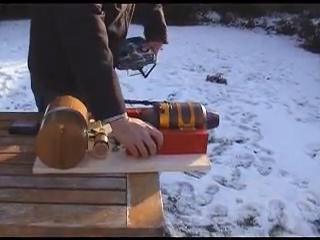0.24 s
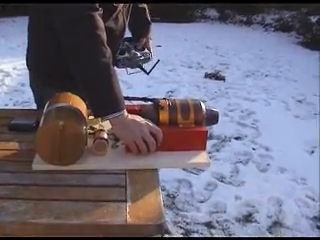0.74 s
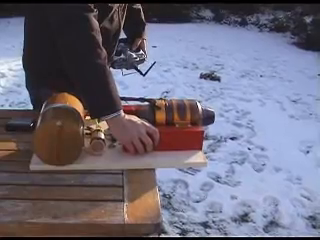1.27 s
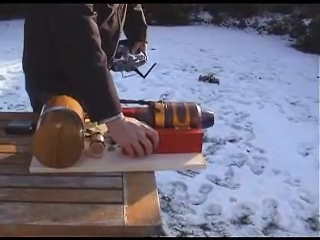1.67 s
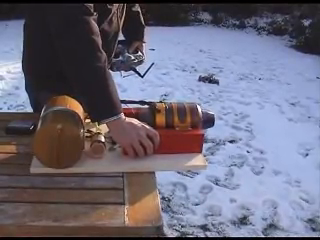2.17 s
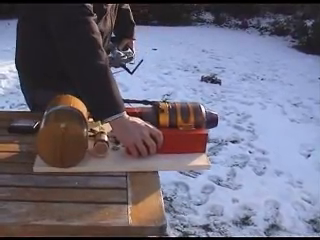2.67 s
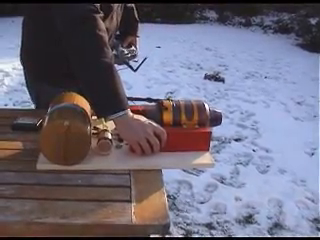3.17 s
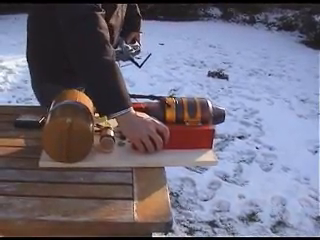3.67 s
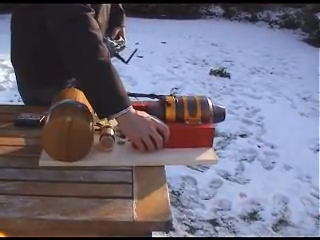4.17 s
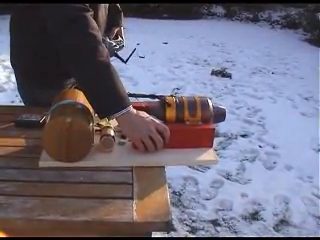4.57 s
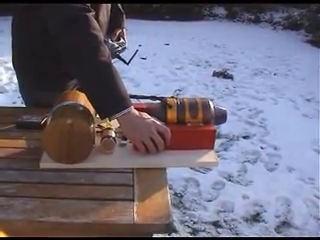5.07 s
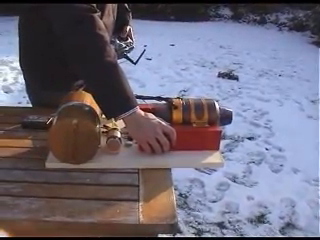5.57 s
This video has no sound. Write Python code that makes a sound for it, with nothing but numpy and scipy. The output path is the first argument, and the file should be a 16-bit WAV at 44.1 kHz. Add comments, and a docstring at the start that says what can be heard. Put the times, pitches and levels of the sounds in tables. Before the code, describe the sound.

A small model jet turbine spools up outdoors on a wooden plank, heard close through a modest handheld microphone. At 0 s a soft, hollow burner roar, centred in the low mids, flutters under thin hiss and a multi-toned whine around 2 to 4 kHz with higher blade tones. The pitch barely rises at first; a tiny bright puff of air spits at about 1.2 s. From 1.5 s the whine climbs faster and the roar, rush and hiss swell, reaching full, rough force near 2.8 s, with loud peaks crackling slightly. The sound cuts out briefly at 2.9 s and again from about 3.05 to 3.2 s, returning abruptly each time. It then stays loud and turbulent, the whine still gliding upward and changing strength through resonances. Hiss brightens most near 5.3 s, then eases. The image is nearly mono, slightly wide in the mids, ending at 5.8 s still running.

```python
"""A soft roar, rush and hiss with a whine, rising slowly from the start: a small model jet turbine on a plank
spools up outdoors. Shaped noise makes the burner's roar in the tail pipe and the jet's rush and hiss, sines
locked to the shaft make the whine, and a short puff of air is added. Echoes off plank and ground cut notches
in the noise. In the sound as it is heard, a band near 5 kHz is weakened for a while, the treble limit wanders,
peaks beyond full scale clip and the sound drops out twice."""
import sys
import numpy as np
from scipy import signal
from scipy.fft import rfft, irfft, next_fast_len
from scipy.io import wavfile
from scipy.ndimage import uniform_filter1d, map_coordinates

SR = 44100
rng = np.random.default_rng(int(sys.argv[2]) if len(sys.argv) > 2 else 0)


def voltage_ratio(decibels):
    """Convert decibels (scalar or array-like) to amplitude ratios, 20 dB per decade."""
    exponent = np.asarray(decibels, float) / 20
    return 10 ** exponent


def waveform_to_disk(signal):
    """Save audio, clipped to [-1, 1], as 16-bit WAV at the path in sys.argv[1]."""
    frames = np.transpose(np.atleast_2d(signal))
    scaled = np.clip(frames, -1, 1) * 32767
    samples = np.round(scaled).astype(np.int16)
    wavfile.write(sys.argv[1], SR, samples)


N = 257544


def unit(x):
    """Scales a signal to rms 1."""
    return x / np.sqrt(np.mean(x ** 2) + 1e-20)


def along(points, hz):
    """Reads a (frequency, value) table on a log frequency axis."""
    f, v = np.transpose(points)
    return np.interp(np.log(hz + 1), np.log(f + 1), v)


def curves(rows):
    """Gives one value per sample for each column after the time."""
    s, *cols = np.transpose(rows)
    return [np.interp(np.arange(N) / SR, s, c) for c in cols]


def wobble(rate):
    """Draws a smooth random curve through `rate` random points a second."""
    points = rng.standard_normal(int(N * rate / SR) + 4)
    return map_coordinates(points, [np.arange(N) * rate / SR])


def filtered(x, response):
    """Multiplies the spectrum of x by a response, which may be complex."""
    m = next_fast_len(N + SR // 2)
    spectrum = rfft(x, m) * response(np.fft.rfftfreq(m, 1 / SR))
    return irfft(spectrum, m)[..., :N]


# Where echoes off plank and ground cancel the direct sound:
# (frequency [Hz], width [Hz], depth [0-1])
NOTCHES = [(438, 30.4, 0.55), (751, 105, 0.56), (969, 137, 0.77), (1269, 94, 0.75), (1574, 79, 0.63),
           (1868, 87, 0.51), (2118, 58, 0.85), (2910, 144, 0.38), (5010, 320, 0.72), (7910, 240, 0.72),
           (10530, 380, 0.4)]


def echoes(hz):
    """Each cancelling echo digs one dip into the spectrum."""
    dips = [1 - np.clip(depth, 0, .95) / (1 + (2 * (hz - centre) / width) ** 2)
            for centre, width, depth in NOTCHES]
    return np.prod(dips, axis=0)


def turbulence(spectrum, patchy_db):
    """Turbulent air is noise with louder and softer patches; coloured, cut by the echoes and set to rms 1."""
    z = signal.stft(rng.standard_normal(N), nperseg=512)[2]
    field = uniform_filter1d(rng.standard_normal(z.shape), size=6, axis=0)
    field = uniform_filter1d(field, size=10, axis=1)
    noise = signal.istft(z * voltage_ratio(patchy_db * unit(field)), nperseg=512)[1][:N]
    return unit(filtered(noise, lambda hz: voltage_ratio(along(spectrum, hz)) * echoes(hz)))


def thrust_level(thrust, idle_db, full_db, power=1):
    """A layer's level in dB moves from idle to full with thrust; a higher power makes it come later."""
    return idle_db + (full_db - idle_db) * np.abs(thrust) ** power


def jet_blend(thrust, idle, full):
    """The full-thrust colour takes over from the idle colour as thrust builds."""
    jet = np.clip(thrust, 0, 1) ** 1.76
    idle_air = np.sqrt(1 - jet) * turbulence(idle, patchy_db=-0.5)
    return idle_air + np.sqrt(jet) * turbulence(full, patchy_db=1.7)


# Colours of the roar, as shapes only: (frequency [Hz], relative level [dB per Hz])
# Low roar at idle
IDLE_ROAR = [(60, -54), (130, -27.5), (200, -15), (290, -6.5), (385, -1), (450, -0.5), (600, -23.5),
             (900, -44.5)]
# Low roar at full thrust
LOW_ROAR = [(60, -63), (130, -38.5), (200, -10), (290, 1), (390, -2.5), (450, -3.5), (600, -12.5),
            (900, -39)]
# High roar at any thrust
HIGH_ROAR = [(250, -79), (400, -3), (460, -5.5), (525, 1), (600, -5), (690, -18), (800, -10.5), (1200, -86)]
# Deep rumble at any thrust
RUMBLE = [(20, -42), (45, -13.5), (80, -2.5), (115, -3), (180, 4.5), (260, -6.5), (400, -48)]


def roar(thrust, flutter):
    """The burner roars in two bands that trade strength at random, over a rumble that builds late."""
    surge_db = 1.18 * wobble(9)
    low_db = thrust_level(thrust, -19, -13) + 0.55 * flutter - 0.31 * surge_db
    high_db = thrust_level(thrust, -24, -12.5) + 0.76 * flutter + surge_db
    rumble_db = thrust_level(thrust, -49, -28, power=1.3) + 0.93 * wobble(5.9)
    low = voltage_ratio(low_db) * jet_blend(thrust, IDLE_ROAR, LOW_ROAR)
    high = voltage_ratio(high_db) * turbulence(HIGH_ROAR, patchy_db=-0.12)
    return low + high + voltage_ratio(rumble_db) * turbulence(RUMBLE, patchy_db=0.9)


# Colours of the rush, as shapes only: (frequency [Hz], relative level [dB per Hz])
# Middle band at any thrust
RUSH = [(400, -23.5), (700, 2), (830, 2.5), (1100, 0.5), (1400, -4), (2000, -11.5), (2500, -17),
        (3200, -19), (5000, -58)]
# Upper band, a whoosh, at idle
IDLE_WHOOSH = [(1500, -44), (2200, -3), (2450, -12.5), (2650, -0.5), (3000, 2), (3500, -8), (4300, -6.5),
               (4500, -11.5), (4900, -24.5), (5400, -34)]
# The whoosh at full thrust
WHOOSH = [(1500, -35), (2200, -5), (2700, 0.5), (3500, -3), (4600, -6), (4900, -2.5), (5400, -45)]


def rush(thrust, flutter):
    """The jet rushes in a middle band and whooshes in a higher one, both stronger with thrust."""
    rush_db = thrust_level(thrust, -34.5, -20) + 0.8 * flutter + 0.4 * wobble(8)
    whoosh_db = thrust_level(thrust, -38, -29) + .55 * flutter
    middle = voltage_ratio(rush_db) * turbulence(RUSH, patchy_db=-0.6)
    return middle + voltage_ratio(whoosh_db) * jet_blend(thrust, IDLE_WHOOSH, WHOOSH)


# Colours of the hiss, as shapes only: (frequency [Hz], relative level [dB per Hz])
# At idle
IDLE_HISS = [(3500, -41), (5000, -11), (5400, -7.5), (5750, -4), (6300, 4), (7200, 0.5), (8600, -7),
             (10000, 1), (12500, 0.5), (16000, -21.5)]
# At full thrust
HISS = [(3500, -42), (4900, -14.5), (5500, -2.5), (6900, 4), (8600, -3), (10000, -1.5), (12500, -37.5),
        (16000, -32)]
# Hiss level before its flutter: (time [s], level [dB])
HISS_LEVEL = [(0, -44.5), (1.4, -42), (2.1, -42.5), (2.6, -37.5), (3.3, -35), (4.6, -36.5), (5.35, -29.5),
              (5.84, -39)]


def hiss(thrust, flutter):
    """The jet's treble noise follows its own level curve and flickers quickly."""
    level_db, = curves(HISS_LEVEL)
    level_db = level_db + 0.53 * flutter + 1.3 * wobble(60) + 0.4 * wobble(6.6)
    return voltage_ratio(level_db) * jet_blend(thrust, IDLE_HISS, HISS)


# How hard the engine pushes: (time [s], thrust [0 idle - 1 full])
THRUST = [(0, 0), (.5, 0.13), (1, 0.21), (1.5, 0.4), (2, 0.53), (2.4, 0.82), (2.8, 1.025), (3.3, 1.006),
          (3.9, 1.03), (4.6, 0.9), (5.3, 0.95), (5.84, 0.91)]


def exhaust():
    """The flame burns unevenly, so all layers but the rumble share one flutter."""
    thrust, = curves(THRUST)
    flutter = wobble(25.155)
    return roar(thrust, flutter) + rush(thrust, flutter) + hiss(thrust, flutter)


def shaft_tone(k, turn):
    """A slightly unsteady sine that turns k times per shaft turn."""
    phase = k * turn + (0.09 + 0.024 * k) * wobble(40)
    return np.sqrt(2) * voltage_ratio(0.78 * wobble(20)) * np.sin(phase)


BEARING = 7.665  # ball passes per shaft turn
# Strong tones before the mount's ringing; all but the bearing's are rounded to whole multiples:
# (multiple of shaft speed [turns], level at lowest speed [dB], slope [dB per doubling of speed])
TONES = [(1.95, -35.5, 0), (4.034, -29.5, 0), (5.964, -35.5, -11), (BEARING, -37.5, 0)]
# Ringing of the engine on its plank: (frequency [Hz], gain [dB])
MOUNT = [(1070, 1), (1110, 3), (1190, 0), (1260, -19), (1450, 0.5), (1600, 0.5), (1720, -22), (2100, -36),
         (2350, -17), (2560, -9), (2720, 9), (2800, 3.5), (2960, -5), (3120, -15), (3250, -8.5),
         (3400, -0.5), (3580, -3), (3750, -9), (4100, -17.5), (4600, -6), (4900, -17), (5200, -26.5),
         (5400, -15), (5700, -3.5), (6100, -6.5), (6550, -10), (6960, 4.5), (7200, -5)]


def strong_tones(hz, turn):
    """Shaft and bearing tones swell where they cross a resonance of the engine on its plank."""
    total = np.zeros(N)
    for k, db, slope_db in TONES:
        level_db = db + slope_db * np.log2(hz / hz[0]) + along(MOUNT, k * hz)
        total += voltage_ratio(level_db) * shaft_tone(k if k == BEARING else round(k), turn)
    return total


# Balance of the blade orders: (multiple of shaft speed [turns], relative level [dB])
BLADES = [(7, -2), (8, -3.5), (9, -6.5), (10, -2.5), (11, -10), (12, -13), (13, -10.5), (14, -11), (15, -9),
          (17, -9.5), (19, -13)]
# Overall blade level before the casing: (time [s], level [dB])
BLADE_LEVEL = [(0, -38.5), (.6, -40), (1.5, -51), (2.0, -47), (2.6, -43), (3.3, -45), (4.3, -43), (5, -61),
               (5.84, -53)]
# How the casing responds to the blades: (frequency [Hz], gain [dB])
CASING = [(3500, -7), (5450, -16), (5900, 0.5), (6600, 5), (7500, -4), (9000, -11), (12000, -30)]


def blade_tones(turn):
    """The blades sound at whole multiples of the shaft speed, coloured by the casing."""
    level_db, = curves(BLADE_LEVEL)
    blades = voltage_ratio(level_db) * sum(voltage_ratio(db) * shaft_tone(round(k), turn) for k, db in BLADES)
    return filtered(blades, lambda hz: voltage_ratio(along(CASING, hz)))


# How fast the shaft spins: (time [s], speed [turns per s])
SPEED = [(0, 538.7), (.6, 545.6), (.9, 551.3), (1.2, 562.5), (1.8, 587.4), (2, 595.9), (2.2, 613.5),
         (2.35, 635.4), (2.85, 695.9), (3.25, 741.8), (3.8, 795.1), (4.4, 847.5), (5, 890.1), (5.3, 907.8),
         (5.84, 939.6)]


def rotor():
    """Adding up the shaft speed gives its angle, which drives all the tones."""
    hz, = curves(SPEED)
    turn = 2 * np.pi * np.cumsum(hz) / SR
    return strong_tones(hz, turn) + blade_tones(turn)


# A short puff of air: (time [s], peak level [dB], decay length [s])
PUFFS = [(1.174, -28.5, .015)]


def puffs():
    """A bright burst of noise rises eight times as fast as it dies away."""
    t = np.arange(N) / SR
    shape = np.zeros(N)
    for start, db, length in PUFFS:
        shape += voltage_ratio(db) * np.exp(-np.abs(t - start) / length * np.where(t < start, 8, 1))
    colour = [(1500, -27), (3000, 0), (5500, -8), (9000, -14), (13000, -28)]  # (Hz, dB)
    air = filtered(rng.standard_normal(N), lambda hz: voltage_ratio(along(colour, hz)))
    return shape * unit(air)


# Difference between the microphone ports, before the trims below:
# (frequency [Hz], side relative to middle [dB])
PORTS = [(60, -52.5), (200, -43.5), (290, -24.5), (400, -47), (750, -52), (950, -25), (1200, -11.5),
         (1550, -7), (2000, -6), (2250, -22.5), (3000, -34.5), (4000, -41), (11800, -60)]


def scene():
    """Two ports differ mostly near 1.5 kHz, by a phase shift and turbulence of their own.

    The whine is also fed faintly into the side, below 4.2 kHz."""
    air, whine = exhaust() + puffs(), rotor()
    lag_s, centre_hz = 0.00035, 1460
    # a quarter turn at the centre, with a delay around it
    shift = lambda hz: -1j * np.exp(-2j * np.pi * (hz - centre_hz) * lag_s)
    side = filtered(air, lambda hz: voltage_ratio(along(PORTS, hz) - 3) * shift(hz))
    side += filtered(exhaust(), lambda hz: voltage_ratio(along(PORTS, hz) - 2.5))
    side += filtered(whine, lambda hz: voltage_ratio(-18) * shift(hz) * (hz < 4200))
    return np.array([air + whine + side, air + whine - side])


# The treble limit wanders: (time [s], limit [Hz])
TOP = [(0, 12500), (1.2, 12550), (1.8, 12300), (1.98, 12000), (2.02, 11580), (2.4, 11580), (2.9, 12050),
       (3.2, 11580), (3.6, 11620), (4.4, 12030), (5.2, 12230), (5.84, 12280)]


def treble_limit(hz, t):
    """Gain that falls to nothing over the last 60 Hz below a moving limit."""
    top = np.interp(t, *np.transpose(TOP))
    return np.clip((top - hz[:, None]) / 60, 0, 1)


def weakened_band(hz, t):
    """Gain of the finished sound that drops in a band near 5 kHz for a while, fading out and back in."""
    start_s, end_s, fade_s = 1.3, 2.52, .1
    centre_hz, width_hz, depth_db = 5080, 340, -17
    on = np.clip(np.minimum(t - start_s, end_s - t) / fade_s, 0, 1)
    return voltage_ratio(depth_db * on * np.exp(-(2 * (hz[:, None] - centre_hz) / width_hz) ** 4))


# Drop-outs, before slight smoothing:
# (cut [s], return [s], first step [dB], fade [dB per s], fade length [s])
GAPS = [(2.917, 2.9965, -16.5, -750, 0.037), (3.04, 3.196, -15, -650, 0.035)]


def dropouts():
    """Gain that steps down, fades fast, stays silent, then suddenly returns."""
    t, gain = np.arange(N) / SR, np.ones(N)
    for cut, back, step_db, fade_db, length in GAPS:
        fade = voltage_ratio(step_db + fade_db * np.clip(t - cut, 0, length))
        tail = fade * (t < cut + length)
        gain = np.where((t > cut) & (t < back), tail, gain)
    return uniform_filter1d(gain, size=40)  # about 1 ms, softens the edges


def low_pass(x):
    """Removes everything above the highest recorded frequency."""
    return signal.sosfilt(signal.butter(12, 12410, fs=SR, output="sos"), x)


def record(dry):
    """Shapes the treble, clips the peaks and cuts the drop-outs."""
    hz, t, z = signal.stft(dry, SR, nperseg=1024)
    shaped = z * weakened_band(hz, t) * treble_limit(hz, t)
    dull = signal.istft(shaped, SR, nperseg=1024)[1][:, :N]
    mix = np.clip(dull, -1, 1) * dropouts()
    return low_pass(mix)


dry = scene()
out = record(dry)
waveform_to_disk(out)
```